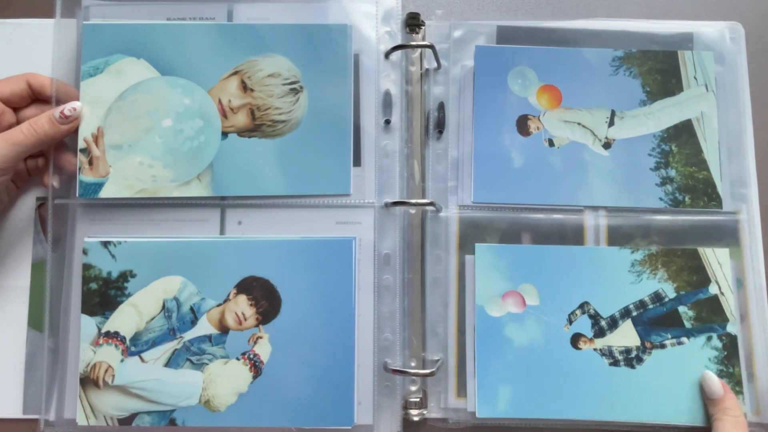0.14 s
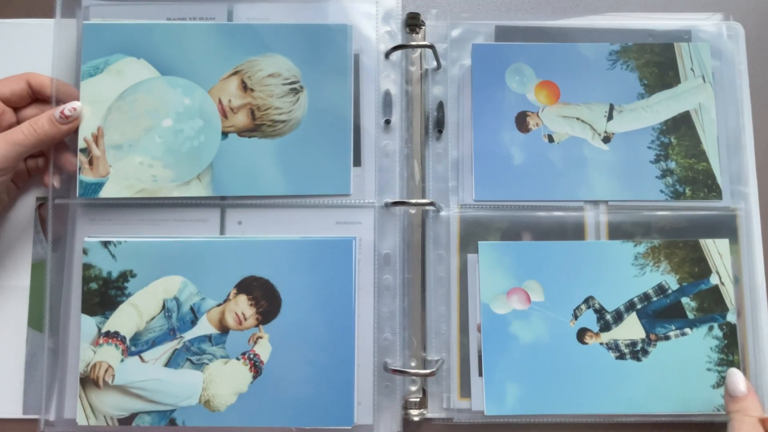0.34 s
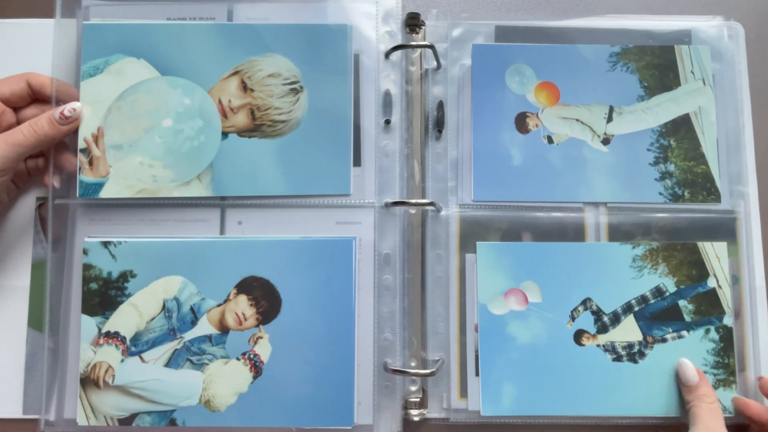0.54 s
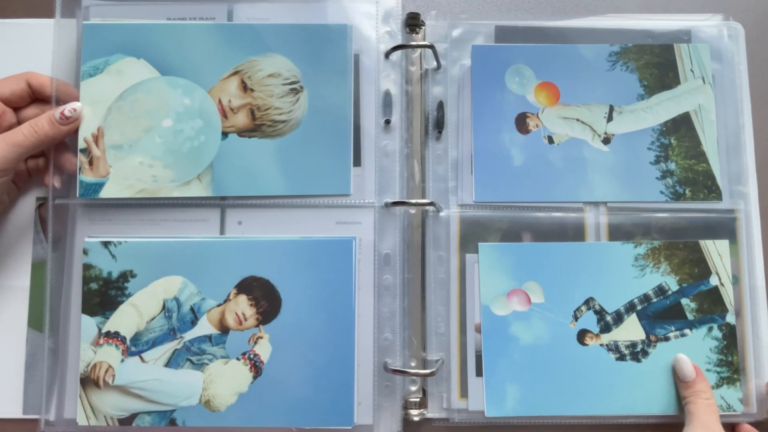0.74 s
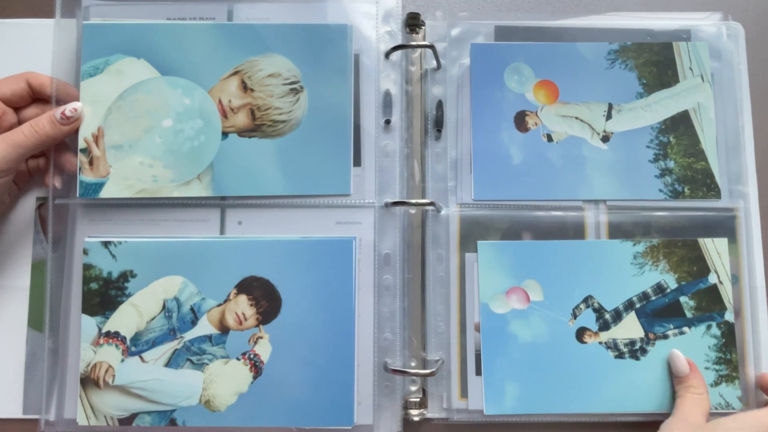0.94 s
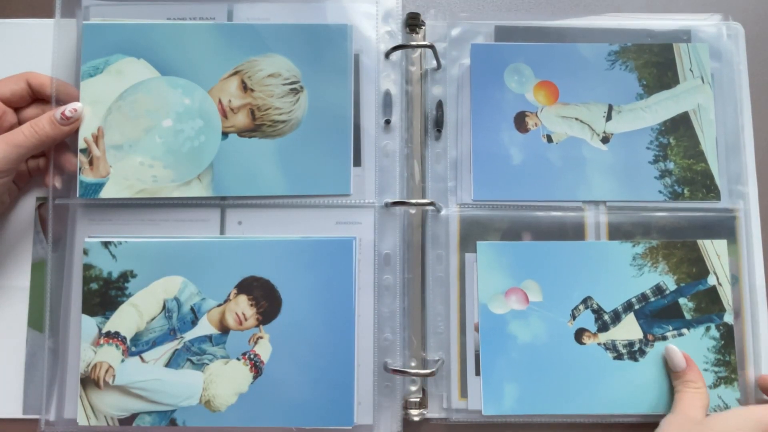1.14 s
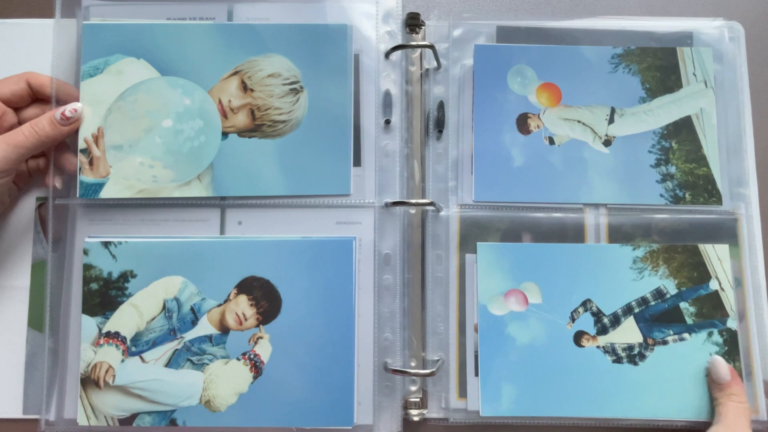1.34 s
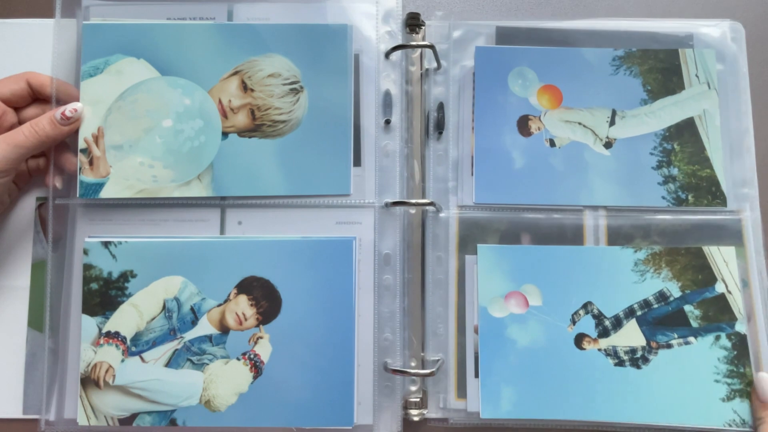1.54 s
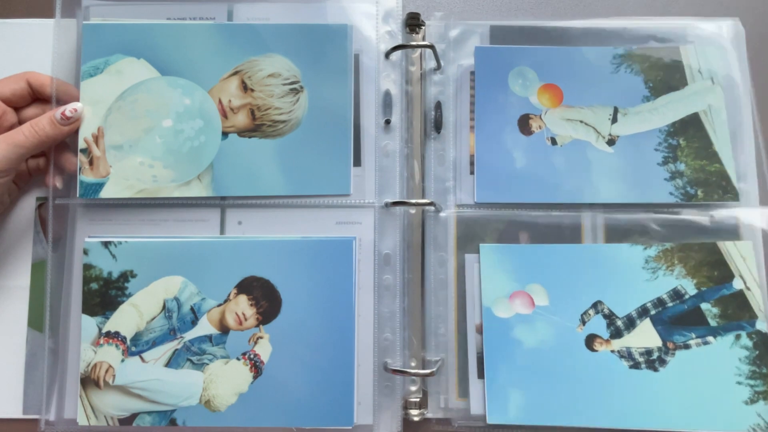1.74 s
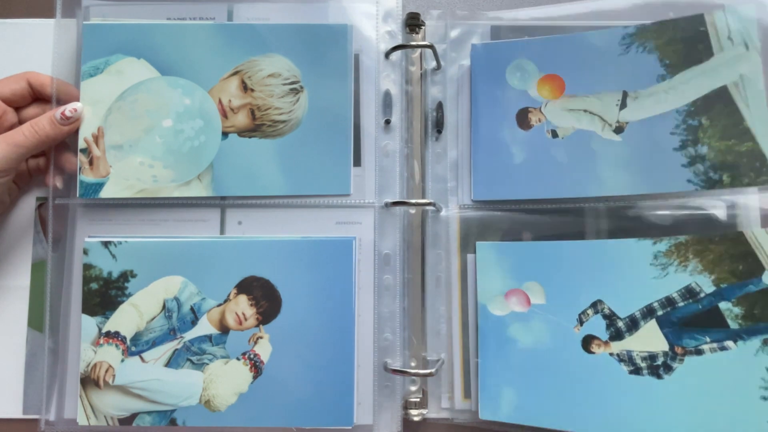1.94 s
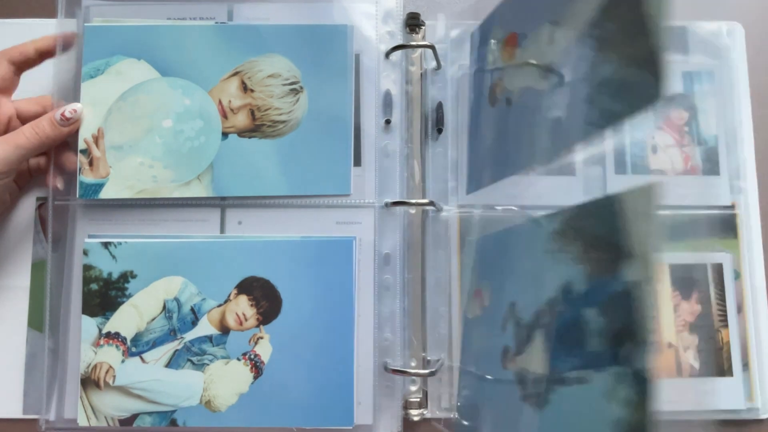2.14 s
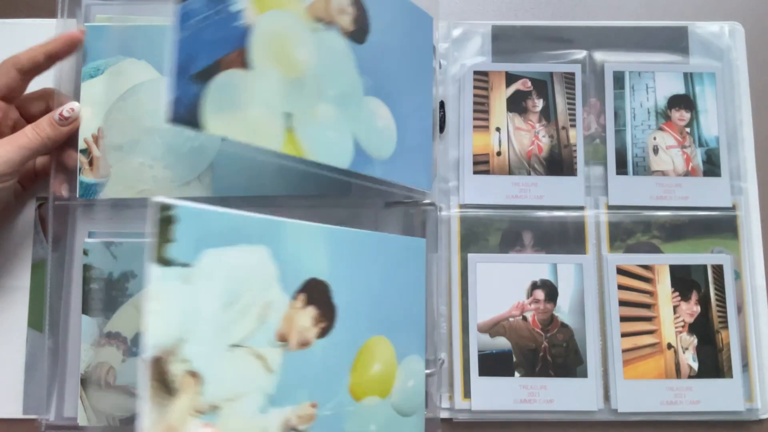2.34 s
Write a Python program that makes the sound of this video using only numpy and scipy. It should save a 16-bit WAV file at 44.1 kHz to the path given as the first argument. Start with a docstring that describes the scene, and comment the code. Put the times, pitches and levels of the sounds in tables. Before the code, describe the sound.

A plastic sleeve page crackles under fingers, with a tight burst of snaps and a soft desk thump early, then faint rustling, a tiny metallic tink, and a louder pop and flapping turn, close in a small room.

```python
"""A hand lifts and turns a plastic sleeve page in a ring binder on a desk, close to a small microphone.
Rumble, hiss and rustle (filtered noise and random slips) run throughout; isolated snaps (damped modes and
noise) start early and crowd near 0.23 s. Thumps ring the desk modes near 0.25 and 0.5 s, a narrow whisper of
resonated slips follows from 0.72 s, and a binder ring tinks at 1.31 s as decaying sines. Fizz swells near 1.8 s;
at 2.17 s the page buckles as one pressure pulse that rings its low modes, and strong bending follows."""
import sys
import numpy as np
from scipy import signal
from scipy.fft import rfft, irfft
from scipy.io import wavfile
from scipy.ndimage import uniform_filter1d

SR = 44100
rng = np.random.default_rng(int(sys.argv[2]) if len(sys.argv) > 2 else 0)


def persist_wave(psi):
    """Save psi, clipped to +-1, as 16-bit WAV."""
    counts = np.round(np.clip(psi, -1, 1) * 32767).astype(np.int16)
    wavfile.write(sys.argv[1], SR, np.atleast_2d(counts).T)


N = 110250


def amp(db):
    """Decibel law: level [dB] to amplitude ratio."""
    return 10 ** (np.asarray(db) / 20)


def unit_rms(x):
    """Power normalisation: scales a signal to rms 1."""
    return x / np.sqrt(np.mean(x ** 2) + 1e-20)


def read_spectrum(points, hz):
    """Linear interpolation on a log-frequency axis."""
    f, value = np.transpose(points)
    return np.interp(np.log(hz + 1), np.log(f + 1), value)


def colour(x, points):
    """Zero-phase filtering: multiplies the spectrum by a gain curve."""
    gain = amp(read_spectrum(points, np.fft.rfftfreq(len(x), 1 / SR)))
    return irfft(rfft(x) * gain, len(x))


def envelope(table, column):
    """Amplitude envelope: one level column, interpolated in dB over time."""
    times = [row[0] for row in table]
    levels = [row[column] for row in table]
    return amp(np.interp(np.arange(N) / SR, times, levels))


def ring_modes(modes, t):
    """Modal superposition: a sum of exponentially decaying sines."""
    return sum(amp(db - 60 * t / t60) * np.sin(2 * np.pi * hz * t) for hz, db, t60 in modes)


# spectrum of the room's rumble and hiss: (frequency [Hz], relative level [dB])
RUMBLE_SPECTRUM = [(10, -3), (30, -10), (47, -4), (62, -16), (85, -23), (200, -27.5), (300, -33.5),
                   (600, -51), (1500, -54), (6000, -50.5), (16000, -54)]
RUMBLE_DB = -48.5  # rms


def room_rumble():
    """Stationary noise: white noise shaped into low rumble and faint hiss."""
    return amp(RUMBLE_DB) * unit_rms(colour(rng.standard_normal(N), RUMBLE_SPECTRUM))


# thumps into the desk: (time [s], level [dB])
DESK_THUMPS = [(0.237, -35.5), (0.259, -46.5), (.493, -55), (.511, -45.5), (.522, -47), (.543, -48)]
# desk modes: (frequency [Hz], relative level [dB], T60 [s])
DESK_MODES = [(119.6, 1, 0.33), (237.5, 0, 0.12), (357, -6, 0.088)]


def desk_thumps():
    """Impulse response: each blow excites the damped modes of the desk."""
    blows = np.zeros(N)
    for s, db in DESK_THUMPS:
        blows[round(s * SR)] = amp(db)
    desk = ring_modes(DESK_MODES, np.arange(SR // 2) / SR)
    return signal.fftconvolve(blows, desk)[:N]


# binder ring modes: (frequency [Hz], level [dB], T60 [s])
RING_MODES = [(4372, -65, .8), (4400, -67, .45), (12400, -71, .25)]
TINK_S, TINK_STOP_S = 1.314, 1.45


def binder_ring_tink():
    """Free vibration, then damping: a touched ring decays until it is stopped."""
    t = np.maximum(np.arange(N) / SR - TINK_S, 0)
    damping = amp(-1000 * np.maximum(t + TINK_S - TINK_STOP_S, 0))  # falls 1000 dB per second
    return damping * ring_modes(RING_MODES, t)


# low modes of the whole page: (frequency [Hz], relative level [dB], T60 [s])
PAGE_MODES = [(363, -1, 0.13), (463, 1.5, 0.12), (532, 1.5, 0.11), (709, 4, 0.087), (888, 1, .08),
              (1416, 1.5, 0.1)]


def page_resonance(x):
    """Resonance: a force convolved with the page's modal impulse response of unit energy."""
    modes = ring_modes(PAGE_MODES, np.arange(SR // 4) / SR)
    return signal.fftconvolve(x, modes / np.linalg.norm(modes))[:N]


GRAINS_PER_S, GRAIN_SPREAD_DB = 5000, 3  # mean rate in each part; scale of the exponential size spread
CLUMP_S, CLUMP_DB = 0.006, 2.5  # smoothing window, used twice; rms swing of the level


def friction_slips():
    """Stick-slip friction: random impulses of uneven size in shared clumps, one row per part."""
    size = amp(GRAIN_SPREAD_DB * np.minimum(rng.exponential(1, (4, N)), 5))
    happens = rng.random((4, N)) < GRAINS_PER_S / SR
    clumps = rng.standard_normal(N)
    for _ in range(2):
        clumps = uniform_filter1d(clumps, round(CLUMP_S * SR))
    return size * happens * rng.standard_normal((4, N)) * amp(CLUMP_DB * unit_rms(clumps))


# corners of the whisper's trapezoid envelope: (time [s])
BRUSH_TIMES = (.72, .88, 1.079, 1.121)
BRUSH_HZ, BRUSH_WIDTH_HZ, BRUSH_DB = 2940, 370, -75


def edge_brush(slips):
    """Band-pass resonance: a finger brushes the edge, and one peak selects a whisper from the slips."""
    b, a = signal.iirpeak(BRUSH_HZ, BRUSH_HZ / BRUSH_WIDTH_HZ, SR)
    whisper = unit_rms(signal.lfilter(b, a, slips))
    return whisper * amp(BRUSH_DB) * np.interp(np.arange(N) / SR, BRUSH_TIMES, [0, 1, 1, 0])


# handling: (time [s], bending level [dB], sliding level [dB], crackle level [dB], fizz level [dB])
RUSTLE_LEVELS = [(0, -74, -92, -70, -75), (0.05, -73.5, -69.5, -68, -71), (0.09, -70, -65.5, -66, -59),
                 (0.2, -64, -63, -61.5, -70), (0.33, -69, -55, -49, -68), (0.42, -79, -66, -70.5, -72),
                 (0.46, -68, -69, -73, -78), (0.5, -61, -58, -56.5, -57), (0.6, -68, -69.5, -68.5, -90),
                 (0.7, -72, -67, -63.5, -94), (0.76, -76, -82.5, -83.5, -84),
                 (0.88, -69.5, -66, -67.5, -73.5), (1.08, -65.5, -71.5, -74.5, -74),
                 (1.14, -80, -73.5, -82, -85), (1.19, -67.5, -70.5, -67, -69),
                 (1.36, -70, -67.5, -65, -64.5), (1.45, -71, -70.5, -70.5, -71), (1.52, -67, -69, -65, -63),
                 (1.57, -73.5, -75, -71, -70), (1.64, -65.5, -78, -73, -78), (1.7, -57, -61, -71, -61),
                 (1.76, -60, -65, -55, -45), (1.79, -53, -56, -47, -32), (1.85, -58.5, -58, -51, -70),
                 (1.93, -57.5, -62.5, -64.5, -59), (2.02, -60.5, -67, -68, -69), (2.08, -60, -65, -60, -63),
                 (2.1, -48, -57, -66.5, -64), (2.16, -54, -56, -52, -55), (2.2, -48, -67, -60, -64),
                 (2.22, -53, -42.5, -53, -47), (2.28, -51.5, -44.5, -50.5, -61), (2.32, -41, -38, -51, -66),
                 (2.36, -53, -66, -79, -81), (2.43, -49.5, -57, -57, -80), (2.5, -48, -46, -54.5, -67)]
# spectra of the parts, low to high: (frequency [Hz], relative level [dB])
BEND_SPECTRUM = [(200, -1), (400, 3), (1300, -1.5), (2000, -27.5)]
SLIDE_SPECTRUM = [(800, -11.5), (1300, 3.5), (2000, 5.5), (3000, 6.5), (4500, 1), (6500, -33.5)]
CRACKLE_SPECTRUM = [(3500, -10.5), (5500, -7.5), (8000, 2.5), (10500, 2), (13000, -23.5)]
FIZZ_SPECTRUM = [(9500, -15), (12500, -0.5), (16000, -12.5)]
PAGE_SHARE_DB = -6.5  # gain of the page ringing under the bending


def rustle():
    """Filtered shot noise: slips coloured as bending, sliding, crackle and fizz; bending also rings the page."""
    slips = friction_slips()
    out = edge_brush(slips[1])
    spectra = [BEND_SPECTRUM, SLIDE_SPECTRUM, CRACKLE_SPECTRUM, FIZZ_SPECTRUM]
    for k, spectrum in enumerate(spectra):
        out = out + envelope(RUSTLE_LEVELS, k + 1) * unit_rms(colour(slips[k], spectrum))
    bending_force = envelope(RUSTLE_LEVELS, 1) * unit_rms(slips[0])
    return out + amp(PAGE_SHARE_DB) * page_resonance(bending_force)


BUCKLE_S, BUCKLE_WIDTH_S = 2.1744, .00009  # time of the peak; decay time of the push on each side
BUCKLE_DB, BUCKLE_RING_DB = -8, -11  # gain of the pulse; gain of the ring relative to it


def page_buckle():
    """Snap-through buckling: a sharp inward push of air, a rebound, and the ring of the page."""
    u = (np.arange(N) / SR - BUCKLE_S) / BUCKLE_WIDTH_S
    rebound = .375 * np.exp(-((u - 4) / 3) ** 2)
    push = -amp(BUCKLE_DB) * (np.exp(-abs(u)) - rebound)
    return push + amp(BUCKLE_RING_DB) * page_resonance(push)


# snaps of the plastic: (time [s], then the relative levels [dB] of five bands, low to high)
SNAP_EVENTS = [(0.068, -53, -48.5, -43, -44, -51), (0.074, -70, -67, -51, -46, -43),
               (0.132, -50.5, -46, -48.5, -73, -70), (0.2272, -25, -23, -24, -36.5, -34),
               (0.2315, -48, -36, -24.5, -33, -31.5), (0.2356, -23, -14, -28.5, -23, -24),
               (0.2404, -32.5, -30, -30, -25.5, -21), (0.2441, -28.5, -35, -17, -28, -20),
               (0.2492, -43, -34, -35, -44, -38), (0.2672, -28, -44, -34, -39.5, -28),
               (0.474, -67, -51, -50, -49.5, -44.5), (0.4782, -48, -49, -46, -44, -64),
               (0.485, -78, -50, -48.5, -43.5, -59), (0.5036, -51.5, -56, -56, -63, -65),
               (0.5622, -65, -86, -56.5, -74, -59), (0.6165, -69, -46.5, -49, -57, -51),
               (0.6486, -71, -52, -52.5, -54, -50), (0.8632, -64, -53.5, -53.5, -51, -61),
               (1.0204, -58.5, -53.5, -53.5, -72, -72.5), (1.2134, -49, -49.5, -41.5, -50.5, -41.5),
               (1.3948, -62, -53, -56, -69, -69), (1.4798, -53, -42.5, -48, -57, -56),
               (1.4858, -58, -71, -50, -41, -57), (1.4888, -53, -48.5, -47, -57, -44),
               (1.5938, -59, -46, -43.5, -45.5, -44.5), (1.681, -59, -49, -61, -44.5, -47),
               (1.703, -59, -38.5, -37, -40.5, -28), (1.712, -57, -66, -63, -39, -43),
               (1.7649, -46, -41, -67, -37, -39), (1.7724, -40, -36.5, -32, -44.5, -26.5),
               (1.785, -62, -61, -50, -41.5, -35), (1.7928, -63, -60, -55, -48, -37),
               (1.8, -70, -43, -65, -58, -36.5), (1.8293, -55, -38, -53, -43.5, -50),
               (1.8853, -43, -42.5, -42, -64, -72), (1.9677, -62, -49, -49, -51.5, -56),
               (2.054, -55.5, -46.5, -57, -47, -72), (2.092, -55, -40.5, -71, -69, -64),
               (2.1175, -49, -46, -68, -49, -61), (2.147, -59, -42, -60, -68, -64),
               (2.209, -73, -22, -40, -41, -31), (2.2579, -65, -36.5, -55, -41.5, -52),
               (2.292, -59, -40, -49, -40, -39), (2.3, -61, -31, -40.5, -36.5, -32.5),
               (2.3346, -32.5, -32.5, -39, -39.5, -37.5), (2.3382, -59, -32.5, -37, -49, -57),
               (2.3905, -51, -39, -51, -44.5, -49), (2.445, -40, -41.5, -63, -55, -53)]
# edges of those bands: (frequency [Hz])
BAND_EDGES = [300, 1200, 3300, 7000, 11500, 16000]
# short modes of a sleeve: (frequency [Hz], relative level [dB], T60 [s])
SLEEVE_MODES = [(400, -3, 0.0064), (716, -11.5, 0.0043), (1230, -1.5, 0.0052), (1720, 1.5, 0.0041),
                (2400, -5, .003), (3880, -1, 0.0033), (5560, 4.5, 0.0022), (8540, 5, 0.0031),
                (10440, 0, 0.003), (12980, 2, 0.0028)]
# overall colour of the snaps: (frequency [Hz], gain [dB])
SHEET_COLOUR = [(200, -12.5), (500, -3), (1700, -0.5), (2800, -1.5), (4300, 0), (6000, 1), (11000, 6.5),
                (13000, 1), (15500, -0.5)]
SNAP_DB, FRAY_DB = 12, -5.5  # gain of a whole snap; gain of its noise
RISE_S, FRAY_T60_S = 0.00035, 0.011  # for crisp snaps; weak ones are slower
CRISP_DB, BLUR_S_PER_DB = -36, .00018  # snaps weaker than CRISP_DB lose their ring and swell slower


def sleeve_snaps():
    """Impulsive modal excitation: each snap rings the sleeve with a noisy edge; snaps take turns over three rows."""
    length = 2048
    t = np.arange(length) / SR
    out = np.zeros((3, N + length))
    centres = np.sqrt(np.multiply(BAND_EDGES[1:], BAND_EDGES[:-1]))
    for k, (s, *bands) in enumerate(SNAP_EVENTS):
        weak_db = max(CRISP_DB - max(bands), 0)
        blur_s = BLUR_S_PER_DB * weak_db
        gains = list(zip(centres, bands))
        detune = rng.uniform(0.871, 1.038, len(SLEEVE_MODES))
        modes = [(hz * d, db + read_spectrum(gains, hz), t60)
                 for (hz, db, t60), d in zip(SLEEVE_MODES, detune)]
        ring = amp(-weak_db) * ring_modes(modes, t)
        # higher bands are wider: tilt the levels to a density per hertz
        density = [(f, db - 10 * np.log10(f / centres[-1])) for f, db in gains]
        fray = colour(rng.standard_normal(length), [(150, -99)] + density)
        fray = fray * amp(FRAY_DB - 60 * t / (FRAY_T60_S + 4 * blur_s))
        rise = np.sin(np.pi / 2 * np.minimum(t / (RISE_S + blur_s), 1)) ** 2
        start = round((s - blur_s / 2) * SR)
        out[k % 3, start:start + length] += amp(SNAP_DB) * (ring + fray) * rise
    return np.array([colour(row[:N], SHEET_COLOUR) for row in out])


# decay of the room: (frequency [Hz], T60 [s])
ROOM_DECAY = [(200, 0.55), (700, 0.43), (1600, 0.32), (2800, 0.27), (5500, 0.29), (12800, 0.19)]
# colour of the reflections: (frequency [Hz], relative level [dB])
ROOM_COLOUR = [(300, -9.5), (1600, -2), (3500, -4), (6000, 0.5), (12000, -2)]
ROOM_START_S = 0.0011  # reflections begin here and are full after twice this time


def room_reflections(x):
    """Diffuse reverberation: convolution with noise whose bands decay at their own rates."""
    hz, t, bands = signal.stft(rng.standard_normal(SR // 2), SR, nperseg=256)
    decay = amp(-60 * t / read_spectrum(ROOM_DECAY, hz)[:, None])
    tail = colour(signal.istft(bands * decay, SR, nperseg=256)[1], ROOM_COLOUR)
    tail = tail * np.clip(np.arange(len(tail)) / SR / ROOM_START_S - 1, 0, 1)
    return signal.fftconvolve(x, tail / np.linalg.norm(tail))[:N]


ROOM_DB = -5.5  # gain of the reflections


def scene():
    """Linear superposition: background, handling, and snaps and buckle with their reflections."""
    background = room_rumble() + desk_thumps() + binder_ring_tink()
    handling = rustle()
    hits = sleeve_snaps()
    hits[0] += page_buckle()
    reflections = sum(room_reflections(row) for row in hits)  # each row has its own random diffuse tail
    return (background + handling + hits.sum(axis=0) + amp(ROOM_DB) * reflections)[None]


# steep roll-off of the top: (frequency [Hz], gain [dB])
TOP_ROLLOFF = [(15750, 0), (16050, -26), (17000, -40)]
EDGE_HZ = 16800  # upper band limit


def record(dry):
    """Linear filtering: a steep treble roll-off, then a linear-phase low-pass."""
    low_pass = signal.firwin(511, EDGE_HZ, window=("kaiser", 9), fs=SR)
    rolled_off = colour(dry[0], TOP_ROLLOFF)
    return signal.oaconvolve(rolled_off[None], low_pass[None], "same")


dry = scene()
out = record(dry)
persist_wave(out)
```